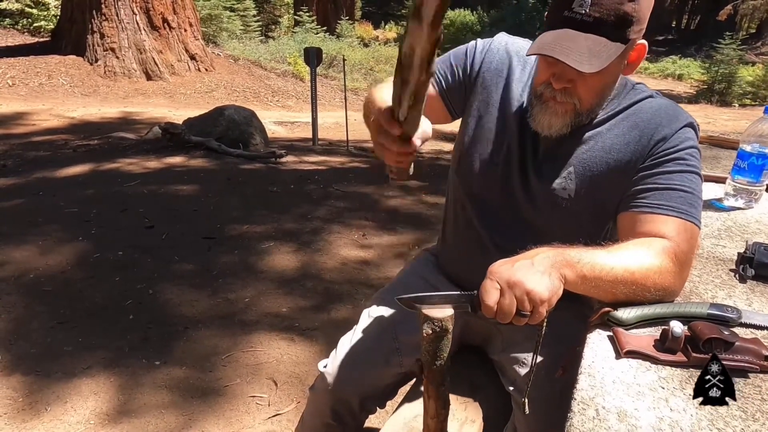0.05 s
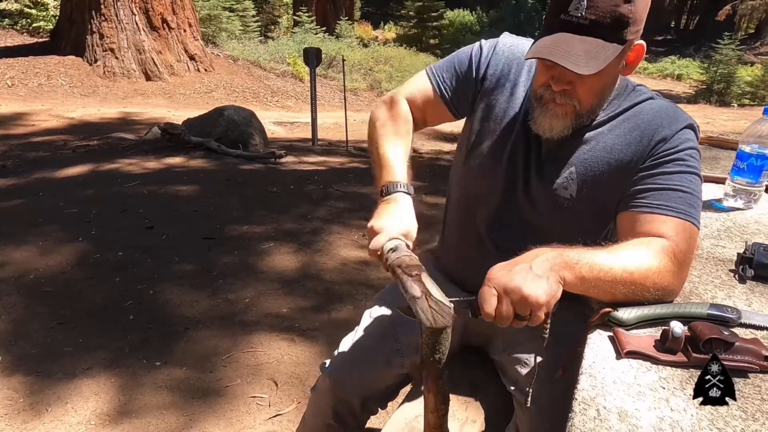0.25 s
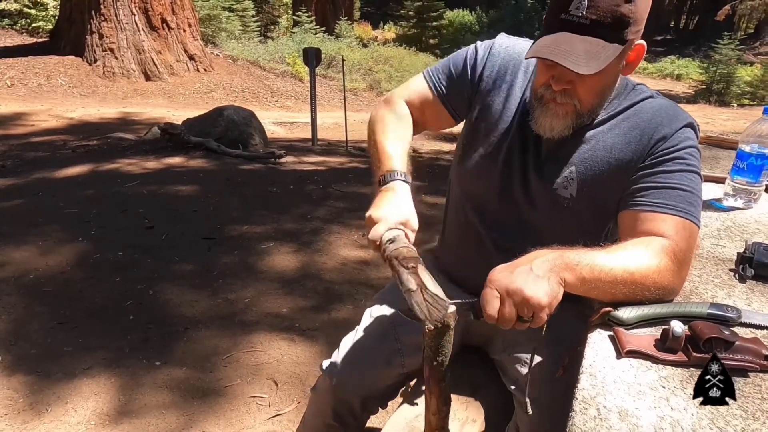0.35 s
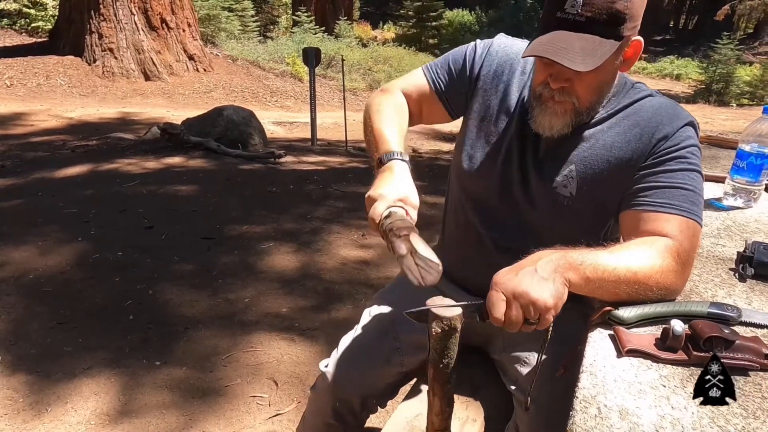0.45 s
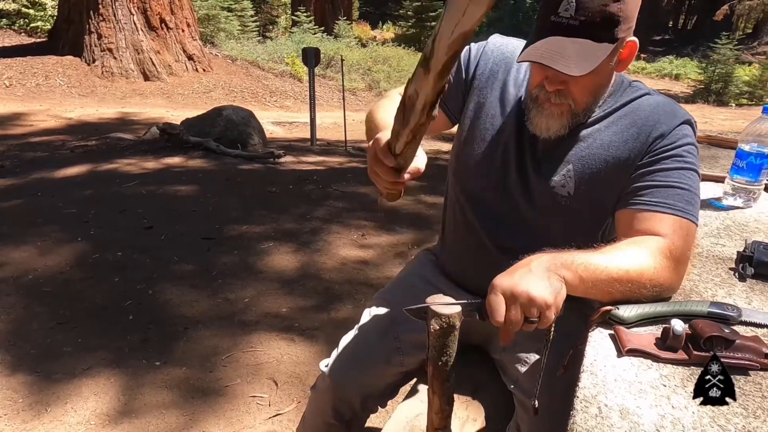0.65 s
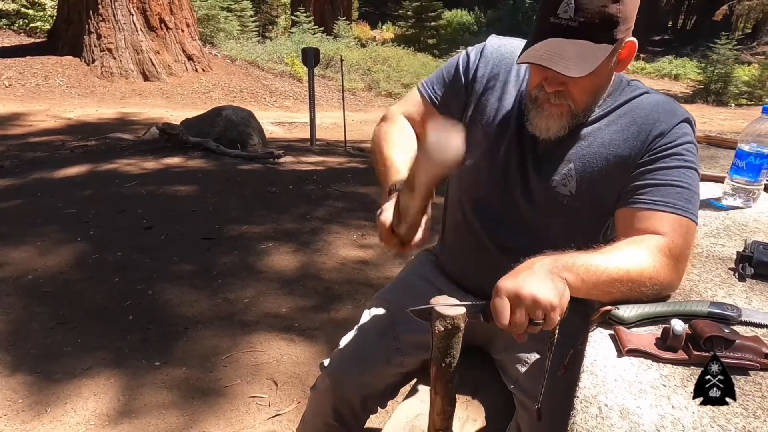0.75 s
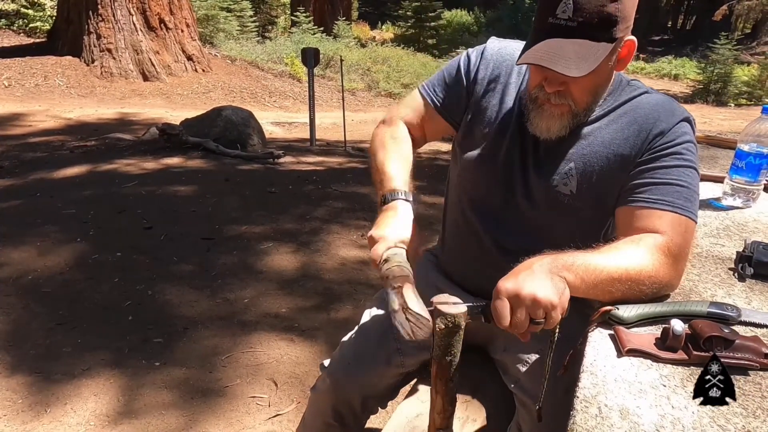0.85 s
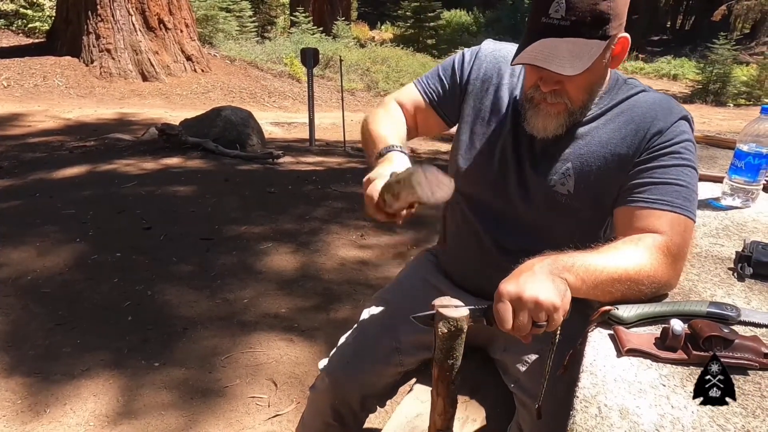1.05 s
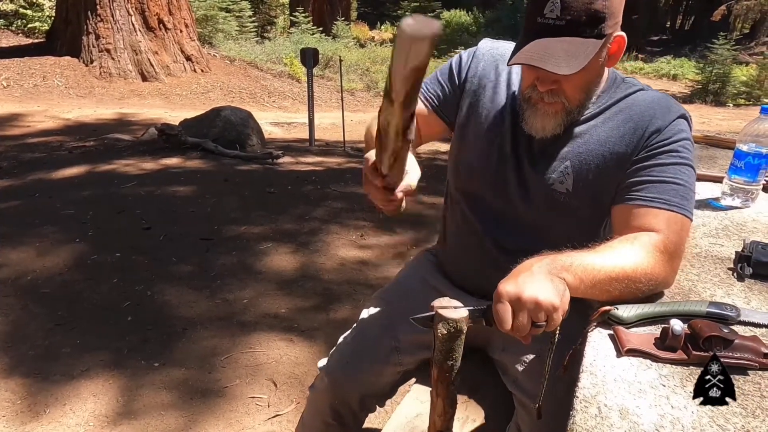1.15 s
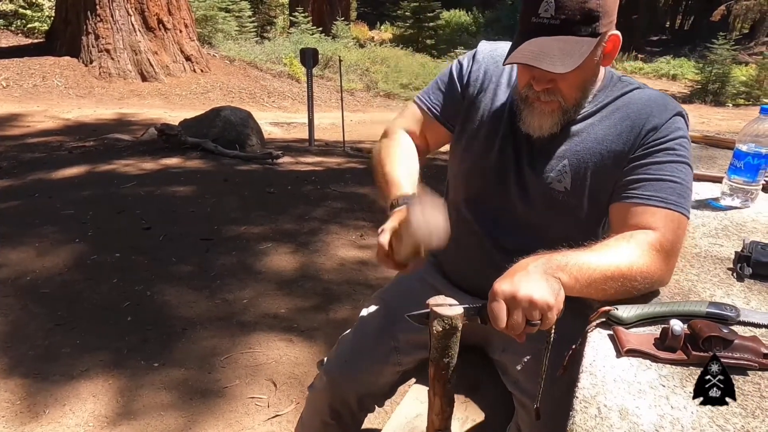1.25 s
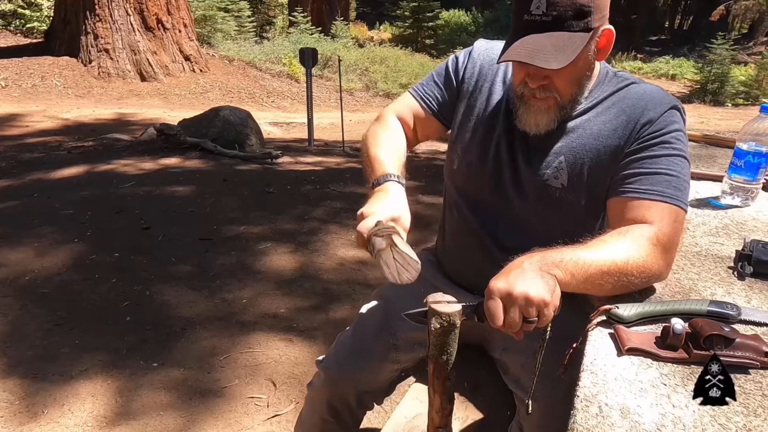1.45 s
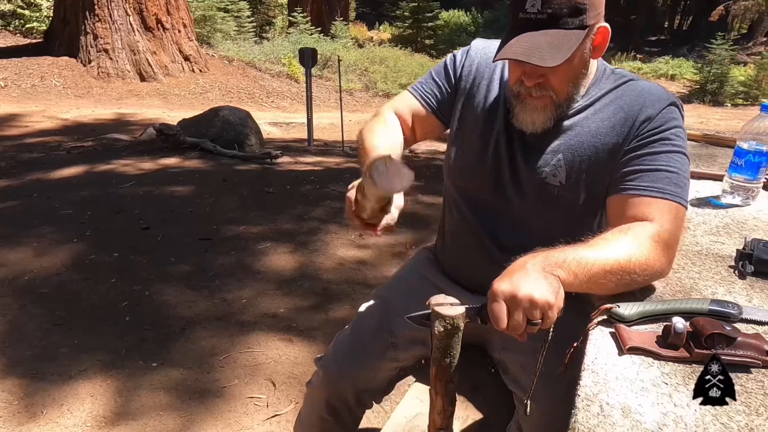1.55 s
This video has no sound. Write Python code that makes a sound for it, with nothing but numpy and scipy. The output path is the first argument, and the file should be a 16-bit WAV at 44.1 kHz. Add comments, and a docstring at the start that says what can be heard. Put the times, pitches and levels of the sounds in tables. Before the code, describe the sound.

Three loud, evenly spaced wood knocks on a knife spine, each bouncing faintly, echoing off trees

```python
"""A forest clearing: a wooden baton hits the spine of a knife set in a small log, three times.
Each blow is a noise crack plus dying sines for baton, blade, log and stump; quieter blows are bounces.
A dull echo follows, and the trees send back a wash of shaped noise; small ticks of wood fall over quiet air.
Thin, faint early copies and a narrow swelling tone lead into every main blow."""
import sys
import numpy as np
from scipy import signal
from scipy.fft import rfft, irfft
from scipy.io import wavfile
from scipy.ndimage import uniform_filter1d

SR = 44100
rng = np.random.default_rng(int(sys.argv[2]) if len(sys.argv) > 2 else 0)


def unload_wav(signal):
    """Save mono or channel-first audio to the path in sys.argv[1] as 16-bit WAV at rate SR, clipped to [-1, 1]."""
    wavfile.write(
        sys.argv[1],
        SR,
        np.round(np.clip(np.atleast_2d(signal).T, -1, 1) * 32767).astype(np.int16),
    )


def undo_db(level):
    """Turn decibels back into plain size, where 20 dB means ten times bigger."""
    steps = np.asarray(level, float) / 20
    return 10 ** steps


N = 70560  # samples, 1.6 s

# Quiet air of the forest floor, relative spectrum: (frequency [Hz], density [dB per Hz])
AIR_SPECTRUM = [(12, -46), (20, -22), (53, -17.5), (228, -10), (388, -13), (485, -16.5), (542, -9),
                (802, -21), (2750, -27.5), (16000, -72.5)]
AIR_DB = -60.5  # overall rms
# Likeness of the air in left and right: (frequency [Hz], correlation [0 to 1])
AIR_LIKENESS = [(60, 0.96), (240, 0.74), (950, 0.89), (3770, 0.6), (15000, 0.3)]

# How each main blow carries to the trees:
# (time [s], level [dB], tilt [dB per octave], upper ring [dB], lower ring [dB])
CARRY = [(.2300, 1.05, 0, -23.5, -26.5), (0.793, 6.6, -5, -49, -31.5), (1.2856, 6.5, -5.5, -49, -37)]
# Two rings that last in the wash: (frequency [Hz], level [dB], t60 [s], rise [s])
CARRIED_RINGS = [(3290, 2, .03, 0.00073), (1892, 1.5, .035, 0.00066)]
# Colour of what comes back, before each blow's tilt: (frequency [Hz], level [dB])
TREES_COLOUR = [(60, -26.5), (200, -13), (400, -4), (800, 5), (1400, -0.5), (2500, -4.5), (4800, -9.5),
                (7000, -19.5), (12000, -46.5)]
# Decay of the wash: (frequency [Hz], t60 [s])
TREES_DECAY = [(200, 1.3), (1000, 0.94), (3300, 0.73), (5000, 0.73), (9000, 0.27)]
TREES_DB, TREES_PEAK_S, TREES_RISE_S = -51.5, 0.17, 0.15  # the wash swells and peaks
NEAR_DB, NEAR_T60_S = -49, 0.14  # ground and bench

# One dull echo of the blows: (frequency [Hz], level [dB])
SLAP_COLOUR = [(150, -31.5), (330, -6.5), (550, 6), (700, -4.5), (1100, -28.5)]
SLAP_S, SLAP_DB = 0.163, -34  # the level adds to the colour

# Small ticks of wood: (time [s], level [dB], centre [Hz], t60 [s])
TICKS = [(.4683, -45, 1460, 0.03), (.4700, -50.5, 4940, .02), (0.694, -62.5, 4850, 0.02),
         (.7304, -56, 7500, 0.0087), (.828, -58, 5000, 0.019), (0.9903, -38, 6200, 0.0096),
         (1.1345, -74, 3100, .01), (1.4158, -55, 5500, 0.0093), (1.4664, -67, 7000, 0.017),
         (1.506, -48.5, 6550, 0.01), (1.5564, -65, 6110, 0.019)]

# What runs ahead of each main blow: (time [s], early copies [dB], swelling tone [dB])
LEADS = [(.2300, -1.1, -24.5), (.7940, -3.2, -18), (1.2839, -7, -20.5)]
# Early copies, one step further ahead each: (level [dB]), added to the blow's own copy level
EARLY_COPIES = [-21.5, -31.5, -50, -50.5]
EARLY_STEP_S, EARLY_LOW_CUT_HZ = 0.0106, 800
# Partials of the swelling tone: (frequency [Hz])
LEAD_PARTIALS = (900, 790)
LEAD_T60_S = 0.045  # runs backwards: the time to swell by 60 dB

# Blows and bounces: (time [s], crack [dB], crack tilt [dB per octave], baton [dB], blade [dB], log [dB],
# log pitch [ratio], log ring time [ratio], stump [dB])
BLOWS = [(.2300, -6.5, 1, -16, -2.5, -7.5, .99, 1.21, -35),
         (.2760, -49, -2.5, -54, -69, -30.5, 1.02, 0.85, -55),
         (.7940, -8, -0.5, -13.5, -29, -5.5, 1.01, 0.91, -22),
         (.8415, -35, 0.3, -40, -44, -26, 1.04, 1.27, -27),
         (.905, -77, -6, -76, -74, -60, 0.74, 0.44, -37.5),
         (1.2836, -5.5, -4.58, -13.5, -44.5, -3, .99, 0.784, -20),
         (1.3233, -30.5, -2.4, -34.5, -41, -28.5, 1.01, 1.18, -24.5),
         (1.364, -77, -2., -56, -68, -38.5, 1.005, 0.93, -47),
         (1.427, -78, 6, -61, -58, -40, .99, 0.66, -46)]
# Spectrum of the crack before its tilt, relative: (frequency [Hz], density [dB per Hz])
CRACK_SPECTRUM = [(290, -34.5), (500, -3.5), (1820, -10.5), (2390, -14), (4600, -13), (5630, -28),
                  (6420, -26.5), (11300, -45.5), (16000, -81.5)]
# Extra dulling of the crack's tail: (frequency [Hz], level [dB])
CRACK_TAIL_COLOUR = [(500, 0), (3000, -3), (6000, -14.5), (12000, -45)]
CRACK_HOLD_S, CRACK_T60_S = 0.0027, 0.015
CRACK_TAIL_DB, CRACK_TAIL_T60_S = -34, 0.23  # level against the crack
# Ringing modes of the baton: (frequency [Hz], level [dB], t60 [s], rise [s])
BATON = [(965, -4, .04, 0.0033), (1052.4, -14.5, 0.03, 0.0016), (1261.4, -1, 0.038, 0.003),
         (1687, -6.5, 0.031, 0.00023), (1843, -5.5, 0.039, 0.00017), (2500, -13.5, .02, 0.0001),
         (3825, 4, 0.0089, .0003), (4343, -7.5, 0.0096, 0.0001), (6130, -20.5, 0.023, .0003)]
# Ringing modes of the blade: (frequency [Hz], level [dB], t60 [s], rise [s])
BLADE = [(1902, -9.5, 0.031, 0.00048), (2222, -11, .025, 0.0024), (3179, -0.5, 0.026, 0.003),
         (3258, -1, 0.02, 0.00082), (4562, -12.5, .025, 0.0017)]
# Modes of the log before each blow's ratios: (frequency [Hz], level [dB], t60 [s], rise [s])
LOG = [(170.85, -3, 0.11, 0.0045), (186.64, -7, .16, 0.0079), (318.7, 2.5, .05, 0.0019),
       (341.5, -12.5, 0.094, .003), (491, -22.5, 0.13, 0.0016), (593.7, -11, 0.063, 0.0013),
       (672, -14.5, 0.079, .002)]
# Low thump modes of the stump: (frequency [Hz], level [dB], t60 [s], rise [s])
STUMP = [(103.6, -1, 0.22, 0.0067), (131.2, -11, 0.19, .015)]
BLADE_LAG_S, LOG_LAG_S = 0.001791, 0.0027  # the blade sounds a little late, the log and stump a little later, together
THIN_HZ = 90  # little deep bass reaches the microphone

# Level balance of the near sounds: (frequency [Hz], left minus right [dB])
PORT_LEAN = [(60, 0), (125, .2), (300, -1.3), (700, -.6), (1500, -1.1), (3000, -1.2), (6000, -.8),
             (10000, .6), (14000, -4)]
# Phase between the ports: (frequency [Hz], left lead [radians])
PORT_LEAD = [(60, .08), (150, .04), (300, -.22), (700, -.24), (1500, -.5), (3000, -.7), (6000, -.6),
             (10000, .6), (14000, 1.5)]
CEILING, EDGE_HZ = 0.93, 16400  # overload point in full scale, top of the band


def evened(x):
    """Brings a sound to an rms of one."""
    return x / np.sqrt(np.mean(x ** 2) + 1e-20)


def read(points, hz):
    """Reads a curve between its points along a log frequency axis."""
    point_hz, value = np.transpose(points)
    return np.interp(np.log(hz + 1), np.log(point_hz + 1), value)


def tilted(points, tilt_db):
    """Tilts a dB curve by so much per octave around 1 kHz."""
    return [(hz, db + tilt_db * np.log2(hz / 1000)) for hz, db in points]


def colour(x, points):
    """Filters by a spectrum in dB."""
    size = x.shape[-1]
    gain = undo_db(read(points, np.fft.rfftfreq(size, 1 / SR)))
    return irfft(rfft(x) * gain, size)


def add(mix, s, sound):
    """Lays a sound into the mix at a time in seconds, cut at the end."""
    part = mix[round(s * SR):][:len(sound)]
    part += sound[:len(part)]


def ring(modes, ratio=1, lasts=1):
    """The modes of one struck object: sines that rise softly and die exponentially."""
    t = np.arange(SR // 2) / SR
    out = np.zeros(len(t))
    for hz, db, t60, rise in modes:
        envelope = undo_db(db - 60 * t / (t60 * lasts)) * (1 - np.exp(-t / rise)) ** 2
        out += envelope * np.sin(2 * np.pi * hz * ratio * t)
    return out


def air():
    """The quiet forest floor of sound: partly shared stereo noise with slowly drifting patches."""
    frames, hz = N // 256 + 5, np.fft.rfftfreq(1024, 1 / SR)
    a, b, c, d, patches = rng.standard_normal((frames, 513, 5)).T
    patches = uniform_filter1d(patches, size=10, axis=0)  # across frequency
    patches = evened(uniform_filter1d(patches, size=12, axis=1))  # along time
    same = np.clip(read(AIR_LIKENESS, hz), -1, 1)[:, None]
    left = a + 1j * b
    right = same * left + np.sqrt(1 - same ** 2) * (c + 1j * d)
    level_db = read(AIR_SPECTRUM, hz)[:, None] + 0.5 * patches
    noise = signal.istft(np.array([left, right]) * undo_db(level_db), nperseg=1024, noverlap=768)[1]
    return undo_db(AIR_DB) * evened(noise[:, :N])


def clearing():
    """A click with two rings returns from near things, then as a swelling wash whose treble dies first."""
    out = np.zeros((2, N))
    noise = rng.standard_normal((len(CARRY), 3, SR))
    for (s, db, tilt_db, *ring_db), hiss in zip(CARRY, noise):
        stereo = 1.1 * hiss[2] + 0.71 * hiss[:2]  # a shared part plus one for each side
        hz, t, z = signal.stft(stereo, SR, nperseg=256)
        swell = np.exp(-((t - TREES_PEAK_S) / TREES_RISE_S) ** 2)
        decay = undo_db(-60 * (t - TREES_PEAK_S) / read(TREES_DECAY, hz)[:, None])
        wash = undo_db(TREES_DB) * np.where(t < TREES_PEAK_S, swell, decay)
        near = undo_db(NEAR_DB - 60 * t / NEAR_T60_S)
        tone = undo_db(db + read(tilted(TREES_COLOUR, tilt_db), hz)[:, None])
        tail = signal.istft(z * (wash + near) * tone, SR, nperseg=256)[1]
        sent = signal.unit_impulse(SR // 2)
        for mode_db, mode in zip(ring_db, CARRIED_RINGS):
            sent += undo_db(mode_db) * ring([mode])
        for channel, sound in zip(out, signal.fftconvolve(sent[None], tail, axes=1)):
            add(channel, s, sound)
    return out


def slap(hits):
    """One dull echo: the blows again, delayed and filtered."""
    late = np.roll(hits, round(SLAP_S * SR))
    return undo_db(SLAP_DB) * colour(late, SLAP_COLOUR)


def ticks():
    """Small ticks of wood: short noise bursts around a centre pitch."""
    out, t = np.zeros(N), np.arange(1024) / SR
    noise = rng.standard_normal((len(TICKS), 1024))
    for (s, db, hz, t60), hiss in zip(TICKS, noise):
        band = [(hz / 8, -12), (hz, 0), (hz * 1.6, -10), (hz * 3, -30), (hz * 6, -60)]
        envelope = undo_db(db - 60 * t / t60) * (1 - np.exp(-t / 0.0004))
        add(out, s, envelope * evened(colour(hiss, band)))
    return out


def leads(hits):
    """Thin faint copies of a blow's first moments come early, over a narrow tone that swells."""
    out, t = np.zeros(N), np.arange(2400) / SR
    thin = signal.sosfilt(signal.butter(2, EARLY_LOW_CUT_HZ, "high", fs=SR, output="sos"), hits)
    tone = sum(np.sin(2 * np.pi * hz * t) / (k + 1) ** 2 for k, hz in enumerate(LEAD_PARTIALS))
    swell = (undo_db(-60 * t / LEAD_T60_S) * tone)[::-1]  # a decay turned backwards
    for s, copies_db, tone_db in LEADS:
        head = thin[round(s * SR):][:1000]
        for k, db in enumerate(EARLY_COPIES):
            add(out, s - (k + 1) * EARLY_STEP_S, undo_db(db + copies_db) * head)
        add(out, s - len(t) / SR, undo_db(tone_db) * swell)
    return out


def crack(hiss, tilt_db):
    """The snap of contact: a brief held noise burst over a longer, duller tail."""
    t = np.arange(len(hiss)) / SR
    hiss = evened(colour(hiss, tilted(CRACK_SPECTRUM, tilt_db)))
    burst = undo_db(-60 * np.maximum(t - CRACK_HOLD_S, 0) / CRACK_T60_S) * hiss
    tail = undo_db(CRACK_TAIL_DB - 60 * t / CRACK_TAIL_T60_S) * colour(hiss, CRACK_TAIL_COLOUR)
    return np.minimum(t / 0.00016, 1) * (burst + tail)


def blows():
    """Each blow or bounce cracks and rings the four struck objects, blade and log a little late."""
    out = np.zeros(N)
    noise = rng.standard_normal((len(BLOWS), 4096))
    baton, blade, stump = ring(BATON), ring(BLADE), ring(STUMP)
    for blow, hiss in zip(BLOWS, noise):
        s, crack_db, tilt_db, baton_db, blade_db, log_db, ratio, lasts, stump_db = blow
        add(out, s, undo_db(crack_db) * crack(hiss, tilt_db))
        add(out, s, undo_db(baton_db) * baton)
        add(out, s + BLADE_LAG_S, undo_db(blade_db) * blade)
        add(out, s + LOG_LAG_S, undo_db(log_db) * ring(LOG, ratio, lasts))
        add(out, s + LOG_LAG_S, undo_db(stump_db) * stump)
    return signal.sosfilt(signal.butter(4, THIN_HZ, "high", fs=SR, output="sos"), out)


def ports(x):
    """Near sound at two microphone ports: level and phase differences split evenly between them."""
    hz = np.fft.rfftfreq(N, 1 / SR)
    half = undo_db(read(PORT_LEAN, hz) / 2) * np.exp(0.5j * read(PORT_LEAD, hz))
    return irfft(rfft(x) * np.array([half, 1 / half]), N)


def scene():
    """Near sounds through the two ports, with the clearing's answer and the air around them."""
    hits = blows()
    near = hits + leads(hits) + ticks() + slap(hits)
    return ports(near) + clearing() + air()


def top_cut(x):
    """Nothing passes above the cut-off."""
    return signal.sosfilt(signal.butter(12, 16440, fs=SR, output="sos"), x)


def record(dry):
    """Hard overload flattens the peaks, then a steep low-pass limits the band."""
    clipped = np.clip(dry, -CEILING, CEILING)
    low_pass = signal.firwin(511, EDGE_HZ, window=("kaiser", 9), fs=SR)
    mix = signal.oaconvolve(clipped, low_pass[None], "same", axes=1)
    return top_cut(mix)


dry = scene()
out = record(dry)
unload_wav(out)
```